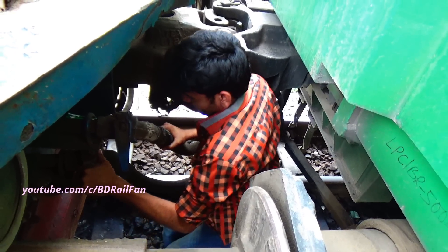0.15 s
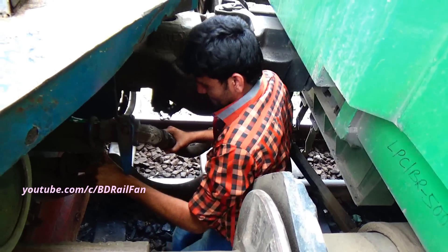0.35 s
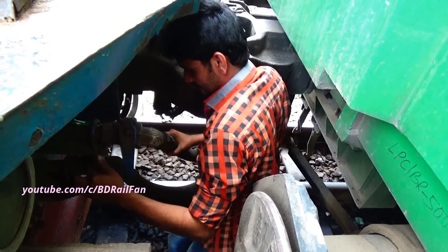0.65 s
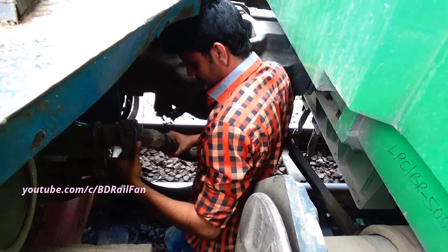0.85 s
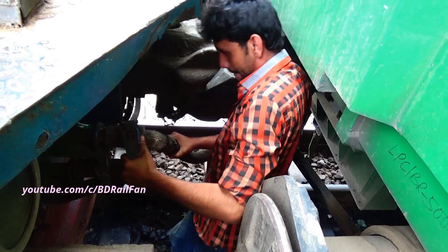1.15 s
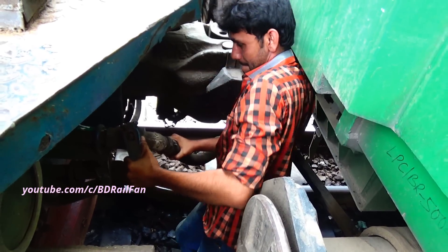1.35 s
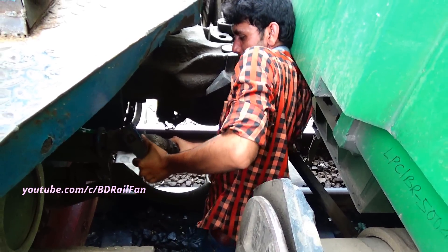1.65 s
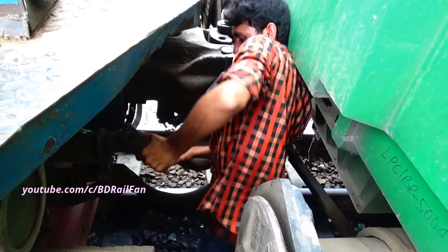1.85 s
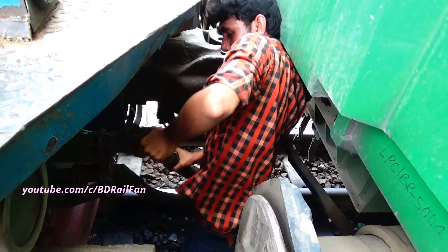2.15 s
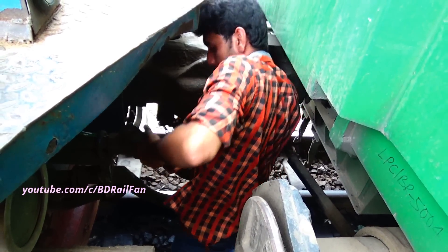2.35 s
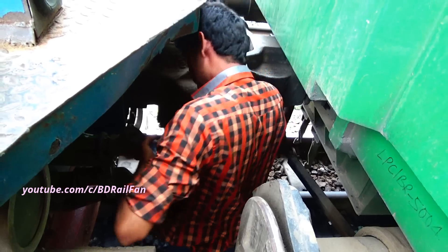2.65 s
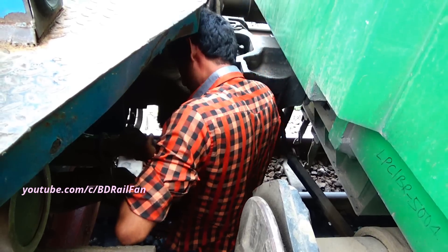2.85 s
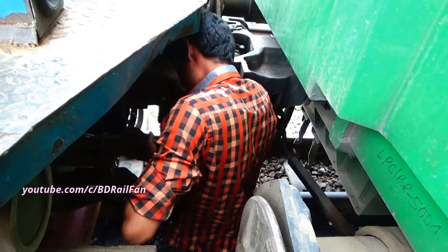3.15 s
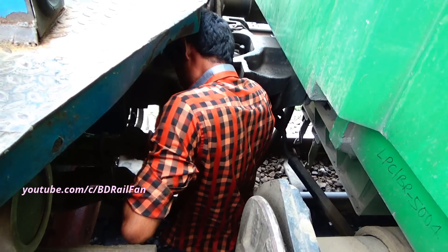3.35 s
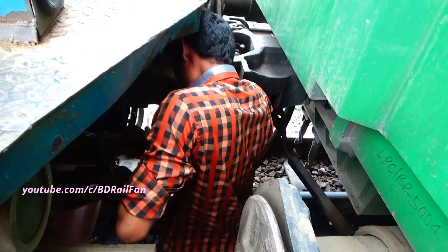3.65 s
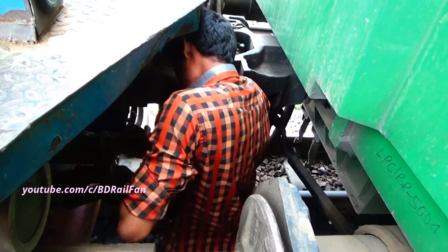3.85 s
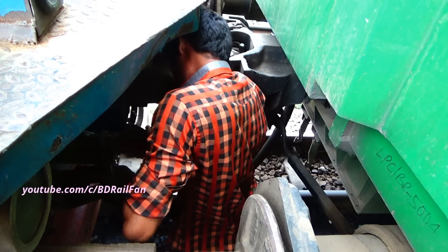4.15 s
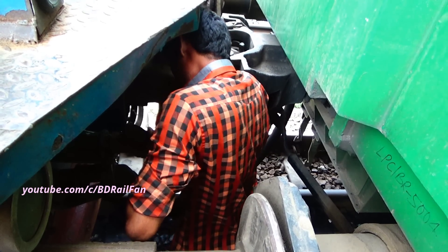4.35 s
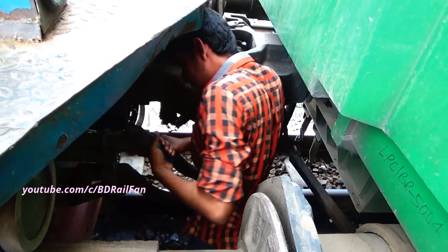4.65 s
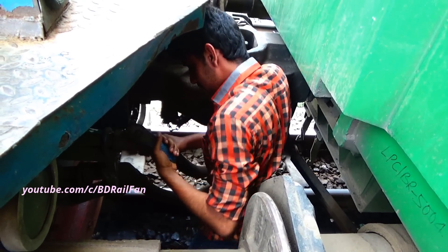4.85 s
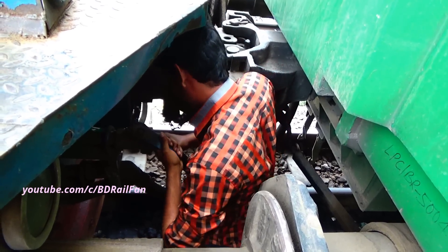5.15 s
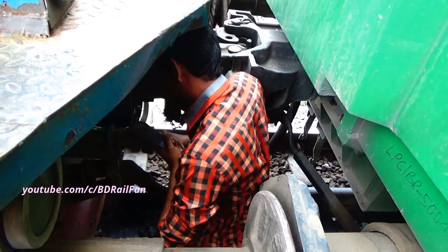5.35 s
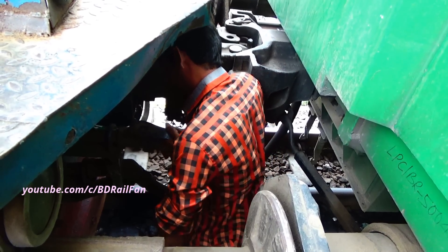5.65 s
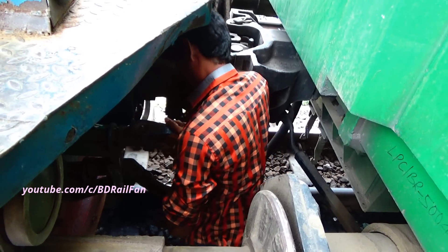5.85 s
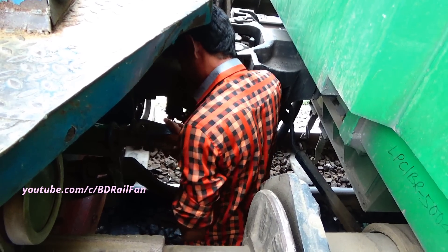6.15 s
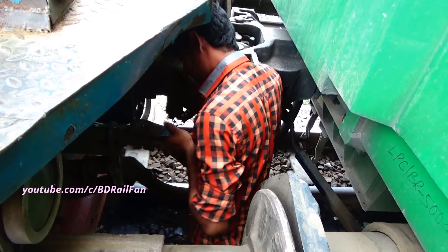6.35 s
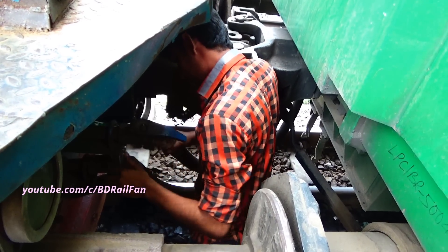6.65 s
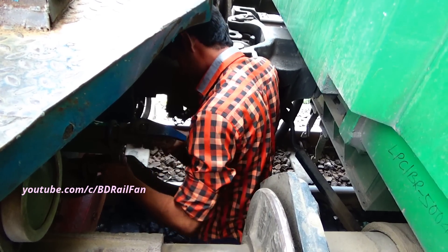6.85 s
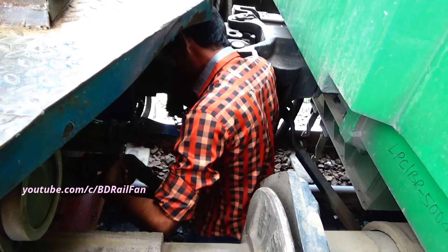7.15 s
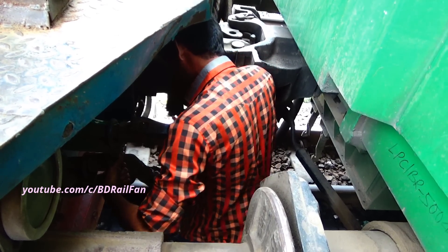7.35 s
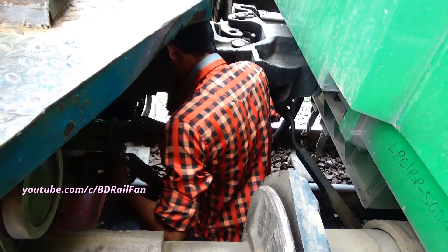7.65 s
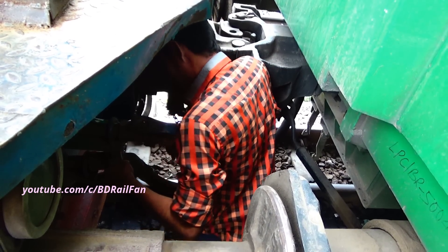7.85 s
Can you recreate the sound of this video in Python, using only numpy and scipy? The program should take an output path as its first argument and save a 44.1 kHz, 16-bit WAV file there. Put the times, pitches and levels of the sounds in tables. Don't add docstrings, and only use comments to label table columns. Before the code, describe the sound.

A diesel locomotive idles with a droning whine; steel lever clicks lead into a long roaring blast of compressed air, then two short distant puffs.

```python
import sys
import numpy as np
from scipy import signal
from scipy.fft import rfft, irfft
from scipy.io import wavfile
from scipy.ndimage import uniform_filter1d

SR = 44100
rng = np.random.default_rng(int(sys.argv[2]) if len(sys.argv) > 2 else 0)


def generate_wav(signal):
    frames = np.transpose(np.atleast_2d(signal))
    scaled = np.clip(frames, -1, 1) * 32767
    pcm = np.round(scaled).astype(np.int16)
    wavfile.write(sys.argv[1], SR, pcm)


def decibels_to_gain(level_db):
    exponent = np.asarray(level_db, float) / 20
    return 10 ** exponent


N = 352800
T = np.arange(N) / SR

# [f/Hz, density/dB per Hz]
AIR_COLOUR = [(59, -57), (100, -23), (188, -23), (228, -22), (264, -16.5), (554, -15.5), (629, -14),
              (1090, -14), (3790, -9), (6160, -6.5), (9200, 1.5), (10200, 1), (15600, -13.5)]
# [f/Hz, side minus mid/dB]
AIR_SIDE = [(60, -20), (110, -7.5), (200, -11), (380, -1.5), (700, -3.5), (1290, -1.5), (2380, -7),
            (4400, -10.5), (8120, -12.5), (15000, -21.5)]


def level(x, db):
    return x * decibels_to_gain(db) / np.sqrt(np.mean(x ** 2))


def curve(table, t):
    s, *columns = np.transpose(table)
    return [np.interp(t, s, c) for c in columns]


def tint(table, hz):
    f, db = np.transpose(table)
    return np.interp(np.log(hz + 1), np.log(f), db)


def bumps(modes, hz):
    return sum(db / (1 + (2 * (hz - f) / width) ** 2) for f, width, db in modes)


def walk(shape, cells):
    x = rng.standard_normal(shape)
    for axis, cell in enumerate(cells):
        for _ in range(2):
            x = uniform_filter1d(x, int(cell), axis=axis)
    return x / x.std()


def ramp(at_s, length_s):
    return np.clip((T - at_s) / length_s, 0, 1)


def since(at_s):
    return np.maximum(T - at_s, 0)


def gust_db(at_s, peak_db, swell_s, hold_s, release_db_per_s, crack_db, sag_db_per_s):
    crack_s = .008
    peak_at_s = at_s + crack_s + swell_s
    crack = -30 * (1 - ramp(at_s, crack_s)) - 200 * (T < at_s)
    swell = crack_db * (1 - ramp(at_s + crack_s, swell_s))
    sag = sag_db_per_s * hold_s * ramp(peak_at_s, hold_s)
    return peak_db + crack + swell - sag - release_db_per_s * since(peak_at_s + hold_s)


def shaped(x, db_of, size):
    overlap = 3 * size // 4
    hz, t, z = signal.stft(x, SR, nperseg=size, noverlap=overlap)
    z = z * decibels_to_gain(db_of(hz[:, None], t))
    return signal.istft(z, SR, nperseg=size, noverlap=overlap)[1][..., :N]


def wide(mid, other, side_table, lag_s=0., pan_table=((1, 0), (2, 0))):
    hz = np.arange(N // 2 + 1) * SR / N
    centre = rfft(mid)
    side = rfft(other) * decibels_to_gain(tint(side_table, hz))
    lag = np.exp(-1j * np.pi * lag_s * hz / (1 + (hz / 500) ** 2))
    port = decibels_to_gain(tint(pan_table, hz) / 2) * lag
    return irfft([(centre + side) * port, (centre - side) / port], N)


def tones(hz, table, moved, swell_db, waver, cell):
    turns = 2 * np.pi * np.cumsum(hz) / SR
    out = np.zeros((2, N))
    for k, first_db, second_db, lead in table:
        swell, drift = (np.interp(T, T[::100], walk(N // 100, (cell,))) for _ in range(2))
        db = first_db + (second_db - first_db) * moved + swell_db * swell
        phase = k * turns + waver * drift + 7 * rng.random()
        out += decibels_to_gain(db) * np.sin(phase + np.array([[lead], [-lead]]) / 2)
    return out


def ring(modes, spread, patchy_db):
    length = N // 4
    out = 0
    for hz, width, db in modes:
        b, a = signal.iirpeak(hz, hz / (spread * width + 40), SR)
        mode = rng.standard_normal((2, length))
        for _ in range(2):
            mode = signal.lfilter(b, a, mode)
        out = out + level(mode, db) * decibels_to_gain(patchy_db * walk(length, (2500,)))
    return np.pad(level(out, 0), ((0, 0), (0, N - length)))


def diesel(firing_hz):
    cylinders_db = [-1, -1.5, 1, -8, -1, 0.5, 1, -1, -2, -9.5, -1, 1.7, -10, -1.5, -1, -0.5]
    # [f/Hz, density/dB per Hz]
    exhaust = [(18, -39.5), (30, -9.5), (202, -2.5), (250, -3.5), (305, 0.5), (614, -7.5), (672, -8.5),
               (735, -5.5), (804, -7.5), (1130, -7.5), (1350, -18.5), (1680, -15), (2200, -26), (2860, -60),
               (4840, -120)]
    # [f/Hz, width/Hz, level/dB]
    exhaust_modes = [(69.5, 30, 4), (125, 33, 9), (165, 25, 2), (195, 14, 3), (231, 27, -5), (305, 61, 0.5),
                     (440, 23, 1.5), (1250, 110, 6.5), (1380, 130, -3.5), (1600, 250, 5), (1920, 60, 5.5)]
    # [f/Hz, density/dB per Hz]
    clatter = [(880, -37), (1500, -9), (1780, -18), (2020, -12.5), (2540, -15), (3620, -21), (6430, -28.5),
               (6960, -29.5), (10600, -27), (16000, -56.5)]
    # [f/Hz, width/Hz, level/dB]
    clatter_modes = [(2600, 110, 2.5)]
    # [f/Hz, side minus mid/dB]
    engine_side = [(60, -22), (110, -20.5), (200, -24), (380, -16.5), (700, -1.5), (1290, -4.5), (2380, -6),
                   (4400, -4.5), (8120, -5.5), (15000, -21.5)]

    def exhaust_db(hz, t):
        patches = 1.2 * walk((len(hz), len(t)), (6, 8))
        return tint(exhaust, hz) + bumps(exhaust_modes, hz) + patches

    def clatter_db(hz, t):
        return tint(clatter, hz) + bumps(clatter_modes, hz)

    turns = np.cumsum(firing_hz) / SR
    fired = np.flatnonzero(np.diff(np.floor(turns)))
    scatter = rng.standard_normal((len(fired), 4))
    paths = []
    for k in range(2):
        pulses = np.zeros(N)
        jitter = (SR * .0006 * scatter[:, k]).astype(int)
        strength_db = np.resize(np.roll(cylinders_db, 5 * k), len(fired))
        pulses[np.clip(fired + jitter, 0, N - 1)] = decibels_to_gain(1.5 * strength_db + 3.2 * scatter[:, 2 + k])
        gas = level(pulses - pulses.mean(), -7.5) + level(rng.standard_normal(N), -2)
        low = shaped(gas, exhaust_db, size=4096)
        rattle = rng.standard_normal(N) * decibels_to_gain(0.39 * walk(N, (300,)))
        high = shaped(rattle, clatter_db, size=1024)
        paths.append(level(low, 1.5) + level(high, -14.5))
    return wide(*paths, engine_side, lag_s=0.0003)


def blower(firing_hz, moved):
    orders = [2, 3, 4, 4.5, 5, 5.5, 6, 7, 8, 9, 10, 12, 13, 14, 21]
    # [level at first place/dB, level at second place/dB, left lead/rad]
    whine = [(-7.5, -21, -1.5), (-11, -20, -1.6), (-21.5, -30.5, -0.87), (-20, -21.5, -.4),
             (-15, -22.5, -.3), (-28, -30.5, -.3), (-10, -15, -0.3), (-20, -20.5, -.7), (-19.5, -17, -1.1),
             (-22.5, -24, -1.1), (-24.5, -27, -.8), (-24, -30, -.3), (-26.5, -27, -.3), (-27.5, -25.5, -.3),
             (-36, -34, -0.72)]
    lobe_hz = 1.404 * firing_hz
    table = np.column_stack([orders, whine])
    out = tones(lobe_hz, table, moved, swell_db=1.5 + 1.2 * moved, waver=.5 + .4 * moved, cell=27)
    return out * decibels_to_gain([[.9], [-.9]])


def crank(firing_hz, moved):
    # [multiple of firing rate, level at first place/dB, level at second place/dB, left lead/rad]
    orders = [(.573, -15.5, -16.5, 0.8), (1, -19, -20.5, 0.28), (1.25, -15.5, -16, -0.15),
              (1.6, -24.5, -20.5, 0.89), (1.83, -13.5, -18.5, -0.8), (2, -29.5, -14.5, 0.25),
              (2.24, -18.5, -13, -0.35), (3, -18, -15.5, -1.16), (3.2, -26.5, -20, -0.87),
              (4, -19.5, -14, -0.48), (6.5, -20, -23.5, -0.73), (12.8, -19, -25, -1.3),
              (19.9, -29, -31, -0.35)]
    return tones(firing_hz, orders, moved, swell_db=3.5, waver=1.15, cell=18)


def leak(moved):
    centre_hz, width_hz, first_db, second_db = 6301, 249, -41, -27
    band_hz = [centre_hz - width_hz / 2, centre_hz + width_hz / 2]
    sos = signal.butter(2, band_hz, "band", fs=SR, output="sos")
    hiss = level(signal.sosfilt(sos, rng.standard_normal(N)), 0)
    return hiss * decibels_to_gain(first_db + (second_db - first_db) * moved)


def lever():
    # [t/s, peak/dB, low edge/Hz, high edge/Hz, t60/s]
    clicks = [
        (0.2265, -11.5, 3300, 11000, 0.026),
        (.2455, -25, 6500, 11000, .04),
        (.43, -38, 8000, 15000, .05),
        (.5, -40, 2000, 9000, .06),
        (0.77, -22, 7300, 10800, .035),
        (.94, -49, 6000, 14000, .04),
        (1.085, -46, 7000, 15000, .03),
        (5.803, -45, 1500, 5000, .03),
    ]
    # [t/s, peak/dB, swell/s, hold/s, release/dB per s]
    strokes = [
        (.26, -43, .07, .09, 160),
        (.49, -40, .03, .05, 200),
        (.56, -50, .02, .6, 200),
    ]
    # [f/Hz, width/Hz, level/dB]
    handle_modes = [(3250, 60, 4), (5330, 50, -1), (7050, 70, -11), (8220, 60, -6), (9230, 60, -5),
                    (9810, 70, -6), (11400, 90, -7), (14300, 60, -20)]
    out = np.zeros((2, N))
    t = np.arange(SR // 10) / SR
    for at_s, db, low_hz, high_hz, t60_s in clicks:
        burst = rng.standard_normal((2, len(t))) * decibels_to_gain(-60 * t / t60_s) * np.minimum(t / .0012, 1)
        band = signal.butter(3, [low_hz, high_hz], "band", fs=SR, output="sos")
        start = int(at_s * SR)
        out[:, start:start + len(t)] += decibels_to_gain(db) * signal.sosfilt(band, burst)
    grit = rng.standard_normal((2, N)) * decibels_to_gain(1.2 * walk(N, (200,)))
    scrape = shaped(grit, lambda hz, t: .5 * tint(AIR_COLOUR, hz) - 6 * (hz / 12000) ** 4, size=512)
    push = sum(decibels_to_gain(gust_db(*stroke, crack_db=-9, sag_db_per_s=14)) for stroke in strokes)
    squeak_db = gust_db(at_s=.285, peak_db=-39, swell_s=.04, hold_s=.095, release_db_per_s=400,
                        crack_db=-12, sag_db_per_s=25)
    out += level(scrape, 0) * push
    out += ring(handle_modes, spread=1.3, patchy_db=.7) * decibels_to_gain(squeak_db)
    return wide(*out, AIR_SIDE)


def air(flow, low_db, top_db, modes, ripple_db):
    # [t/s, f/Hz, level/dB]
    hose_pitch = [
        (1.6, 700, -0.5),
        (2.4, 633, 3.5),
        (3.4, 628.4, 8),
        (4.2, 690, 9),
        (5.6, 648.6, 6.5),
    ]
    # [f/Hz, left minus right/dB]
    pan = [(60, 1), (110, 0.0), (200, 0.0), (380, 1), (700, -0.5), (1290, 0.5), (2380, 0.5), (4400, -0.5),
           (8120, 1.5), (15000, 1.5)]

    def gain_db(hz, t):
        low, top = np.interp(t, T, low_db), np.interp(t, T, top_db)
        octaves = np.clip(np.log2(hz / 9000 + 1e-3), -2.6, 1)
        tilt = np.where(octaves < 0, -octaves / 1.77 * (low + 11), octaves / .65 * (top + 13))
        hose_hz, hose_db = curve(hose_pitch, t)
        hose = bumps([(hose_hz, 90, hose_db)], hz)
        flicker = 0.44 * walk((len(hz), len(t)), (28, 6))
        ripple = np.repeat(walk((len(hz), len(t) // 8 + 1), (2, 14)), 8, axis=1)[:, :len(t)]
        return tint(AIR_COLOUR, hz) + bumps(modes, hz) + hose + tilt + flicker + ripple_db * ripple

    eddies = rng.standard_normal((2, N)) * decibels_to_gain(0.35 * walk(N, (60,)))
    return flow * decibels_to_gain(6.0) * wide(*shaped(eddies, gain_db, size=1024), AIR_SIDE, pan_table=pan)


def jet(shut_at_s):
    # [t/s, jet level/dB]
    opening = [
        (1.176, -55),
        (1.19, -40),
        (1.28, -36),
        (1.36, -26),
        (1.42, -21),
        (1.52, -13.5),
        (1.62, -13),
        (1.8, -13),
    ]
    # [f/Hz, width/Hz, level/dB]
    modes = [(970, 60, 1.5), (2320, 110, 3), (3510, 143, 1), (4770, 52, -1), (5120, 93, 2.5),
             (8920, 320, 2), (9320, 110, -0.5), (10010, 570, 2)]
    opens_at_s, opened_s = opening[0][0], opening[-1][0]
    held_db = curve(opening, T)[0] - 0.18 * since(opened_s) - 200 * (T < opens_at_s)
    tail_db = -39 - 90 * since(shut_at_s) - 200 * (T < shut_at_s)
    flow_db = np.maximum(held_db - 620 * since(shut_at_s), tail_db)
    weak_db = np.clip(-13.5 - flow_db, 0, 45)
    surge_db = -5 * np.exp(-((T - 1.473) / 0.074) ** 2)
    fill_db = -3.5 * (1 - np.exp(-since(opened_s) / 0.95))
    opening_up = T < opened_s
    low_db = -10 + np.where(opening_up, 0.39, .2) * weak_db + fill_db + surge_db
    top_db = -12.5 + np.where(opening_up, .2, -.22) * weak_db
    return air(decibels_to_gain(flow_db), low_db, top_db, modes, ripple_db=1.27)


def whistle():
    # [f/Hz, width/Hz, level/dB]
    cavities = [(2920, 80, -4), (3540, 80, -3), (4080, 60, -14), (5090, 90, -15), (6000, 90, -4),
                (6300, 110, -1), (6840, 66, -5), (7330, 65, -7), (8060, 50, -8), (8330, 55, -6),
                (8750, 60, -4), (9300, 70, -8), (9690, 70, 0), (10300, 70, -5), (10520, 60, -5),
                (10800, 40, -9), (11700, 70, -8), (12300, 100, -13), (13250, 90, -12), (13800, 150, -13),
                (14300, 90, -16)]
    db = gust_db(at_s=1.183, peak_db=-19.5, swell_s=.12, hold_s=.09, release_db_per_s=75,
                 crack_db=-7, sag_db_per_s=15)
    return wide(*ring(cavities, spread=1.7, patchy_db=1.5), AIR_SIDE) * decibels_to_gain(db)


def gain_control_db(shut_at_s):
    open_db, clamp_at_s, clamp_s = -23.5, 1.287, .15
    clamp_db = -22 * ramp(clamp_at_s, clamp_s)
    settle_db = -4 * ramp(clamp_at_s + clamp_s, 1.4)
    let_go_db = 2.5 * ramp(shut_at_s, 0.099)
    creep_db = 3.5 * since(shut_at_s)
    return open_db + clamp_db + settle_db + let_go_db + creep_db


def puffs(shut_at_s):
    # [t/s, peak/dB, swell/s, hold/s, release/dB per s]
    vents = [
        (5.796, -48, .01, .17, 70),
        (6.988, -33, .075, 0.19, 120),
        (7.341, -32, .085, .01, 82),
    ]
    # [f/Hz, width/Hz, level/dB]
    modes = [(8600, 2700, 0.5), (3000, 2500, 1)]
    db = np.array([gust_db(*vent, crack_db=-6.5, sag_db_per_s=31) for vent in vents])
    peak_db = np.array(vents)[db.argmax(axis=0), 1]
    weak_db = np.clip(peak_db - db.max(axis=0), 0, 25)
    flow = decibels_to_gain(db).sum(axis=0)
    seep = decibels_to_gain(-76 + 3 * since(shut_at_s)) * (T > shut_at_s)
    share = flow / (flow + seep + 1e-9)
    low_db = -8 + .36 * weak_db
    vent_top_db = -17.5 - .25 * weak_db + 0.4 * (peak_db.max() - peak_db)
    top_db = share * vent_top_db + (1 - share) * -11
    return air(flow + seep, low_db, top_db, modes, ripple_db=1.1)


def scene():
    # [t/s, firing rate/Hz, share of the move 0-1]
    speed = [
        (0, 88.36, 0),
        (1.3, 88.04, 0.1),
        (1.6, 88.1, 0.43),
        (5.7, 87.5, .95),
        (8, 87.25, 1),
    ]
    shut_at_s = 5.635
    firing_hz, moved = curve(speed, T)
    engine = decibels_to_gain(-.5) * diesel(firing_hz) + leak(moved)
    engine += decibels_to_gain(9.5) * (blower(firing_hz, moved) + crank(firing_hz, moved))
    heard = engine * decibels_to_gain(gain_control_db(shut_at_s) + 2.0)
    return heard + lever() + jet(shut_at_s) + whistle() + puffs(shut_at_s)


def band_limit(x):
    return signal.sosfilt(signal.butter(12, 16650, fs=SR, output="sos"), x)


def record(dry):
    rounded = np.tanh(1.5 * dry) / 1.38
    hz = np.arange(N // 2 + 1) * SR / N
    top_cut = np.clip((15770 - hz) / 60, 0, 1)
    mix = irfft(rfft(rounded) * top_cut, N)
    return band_limit(mix)


dry = scene()
out = record(dry)
generate_wav(out)
```